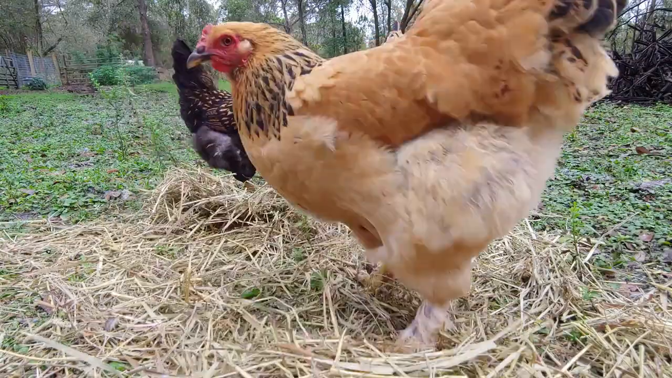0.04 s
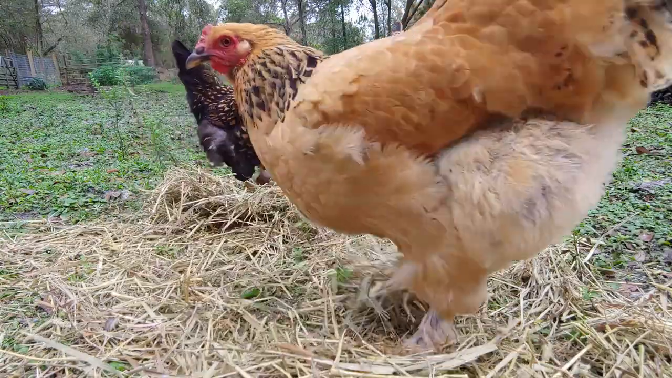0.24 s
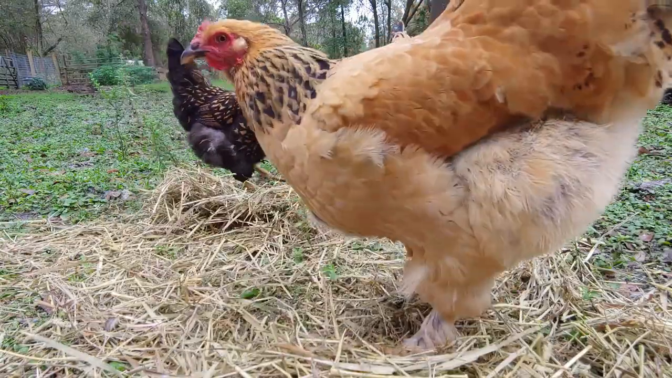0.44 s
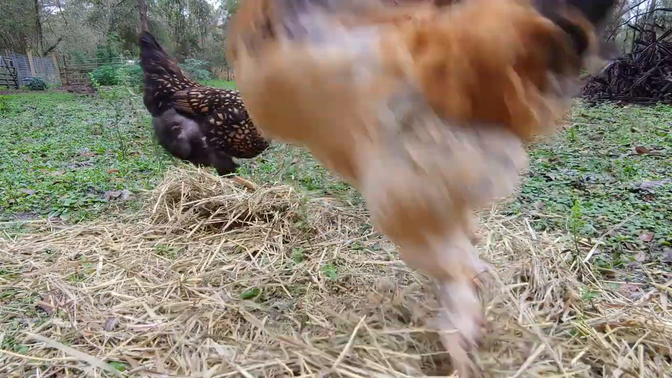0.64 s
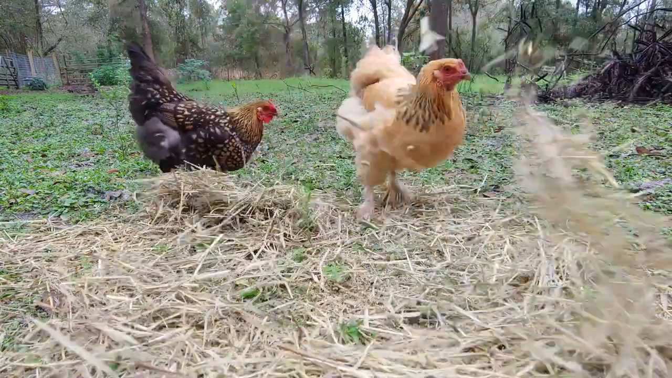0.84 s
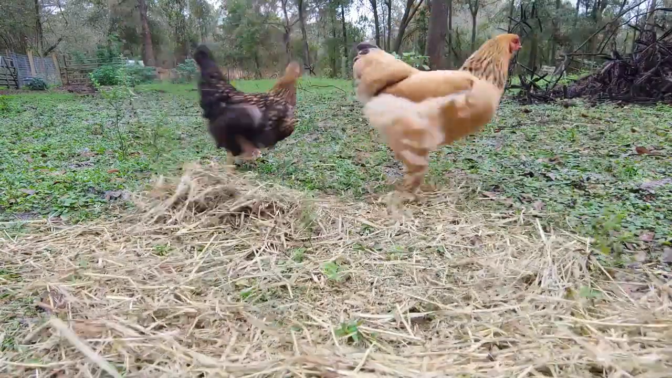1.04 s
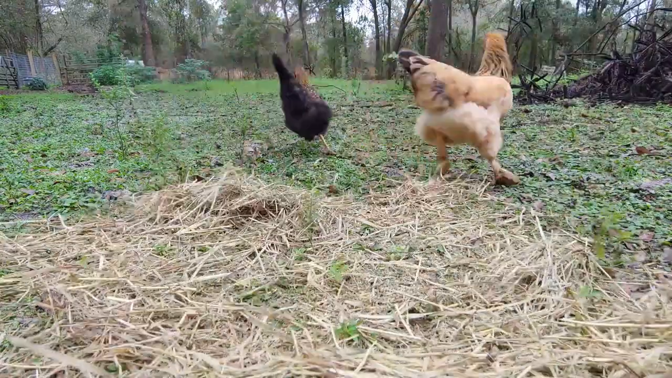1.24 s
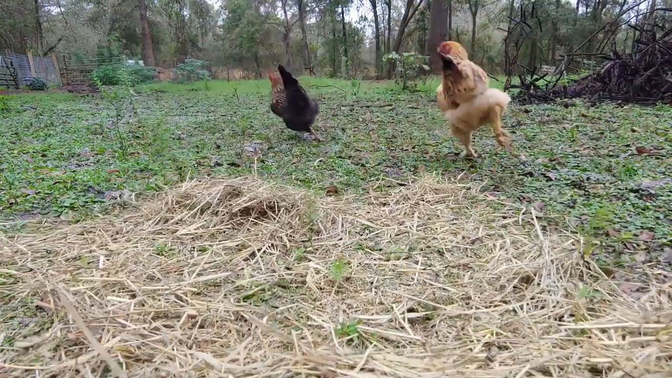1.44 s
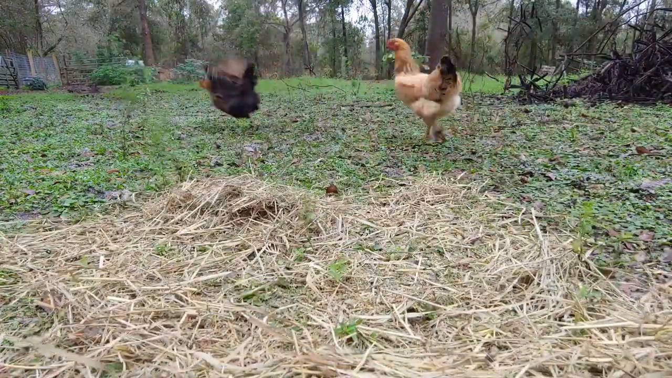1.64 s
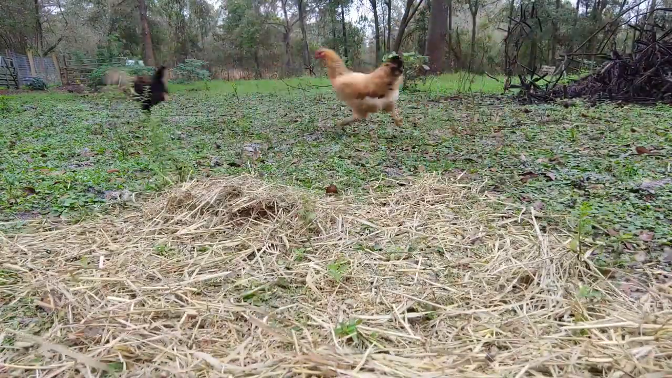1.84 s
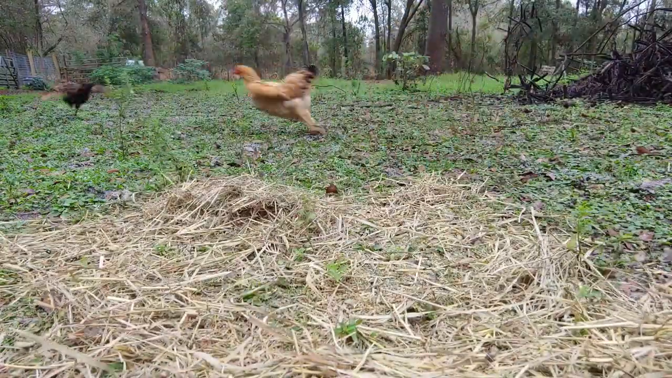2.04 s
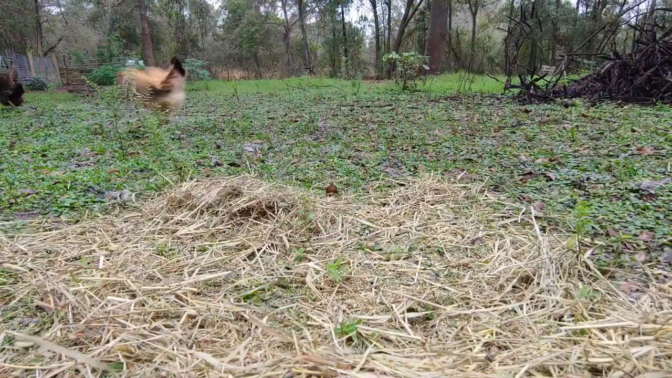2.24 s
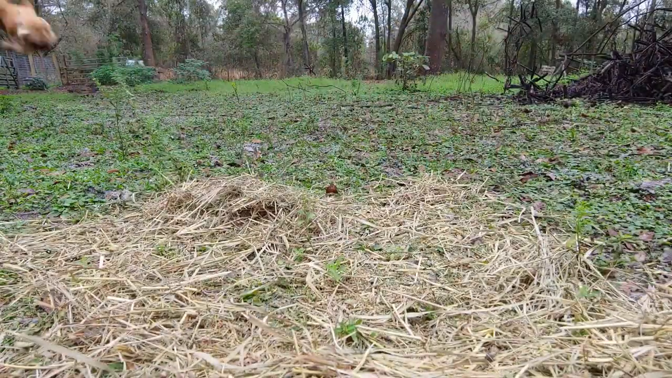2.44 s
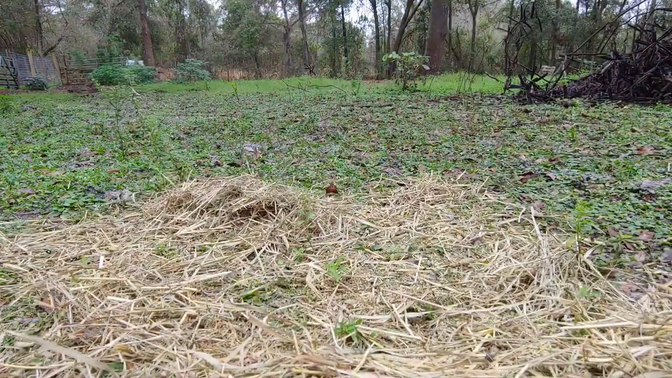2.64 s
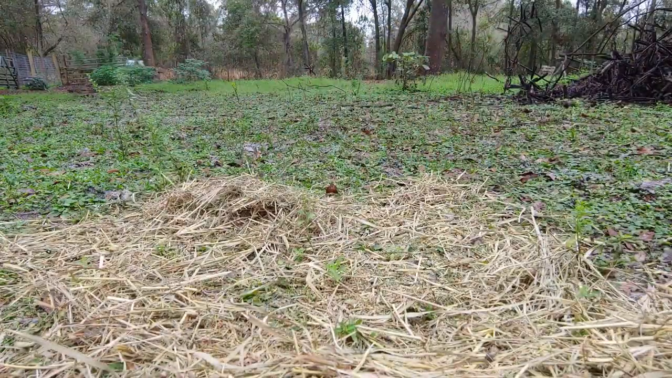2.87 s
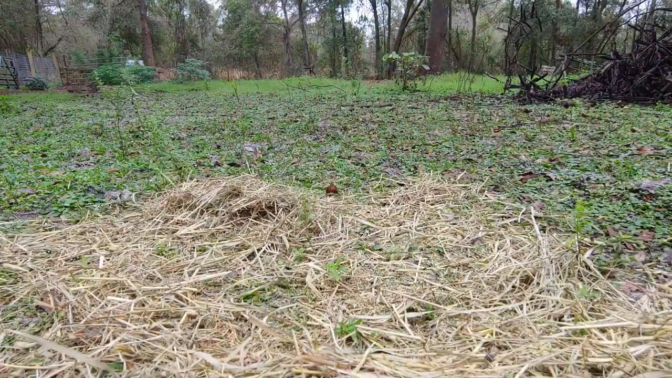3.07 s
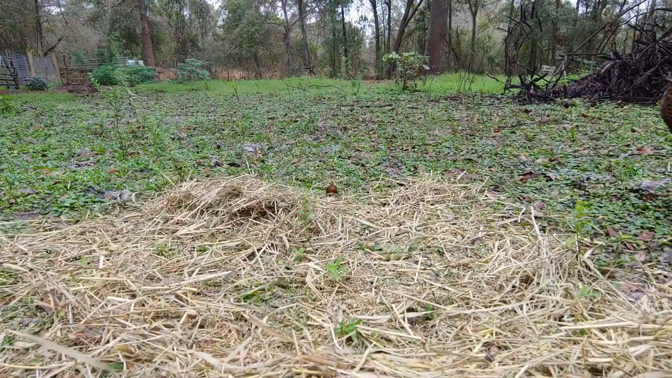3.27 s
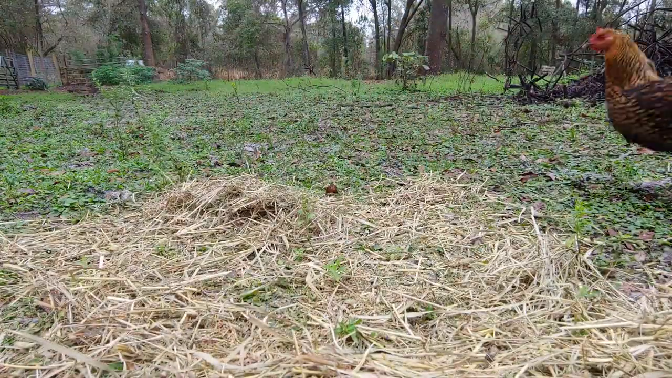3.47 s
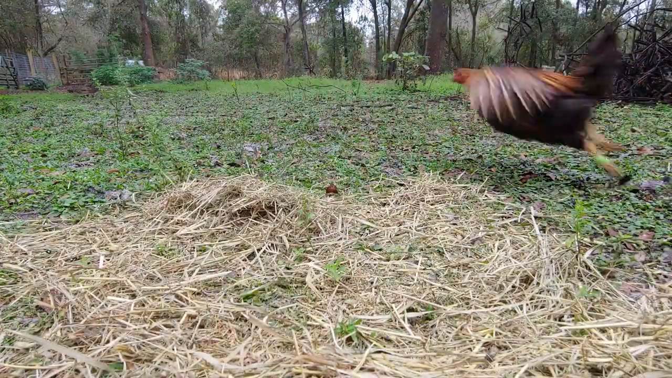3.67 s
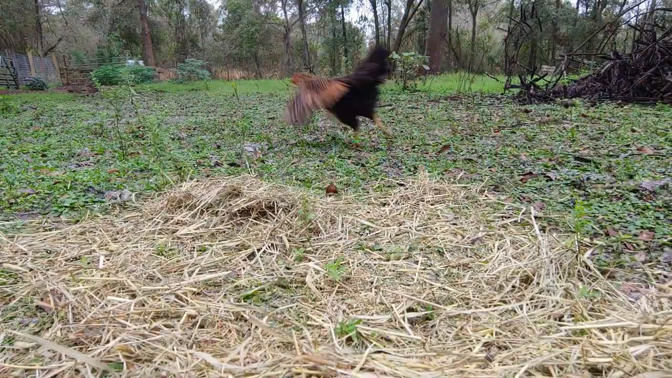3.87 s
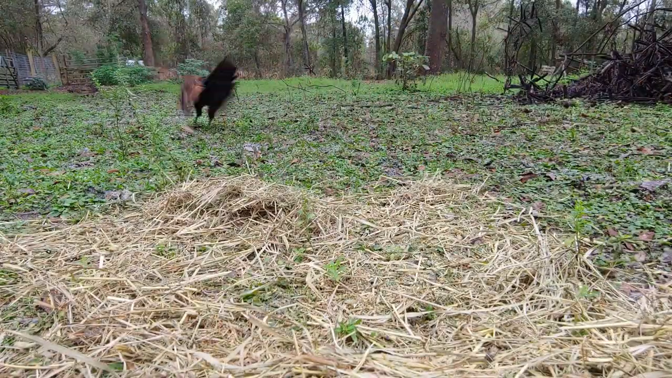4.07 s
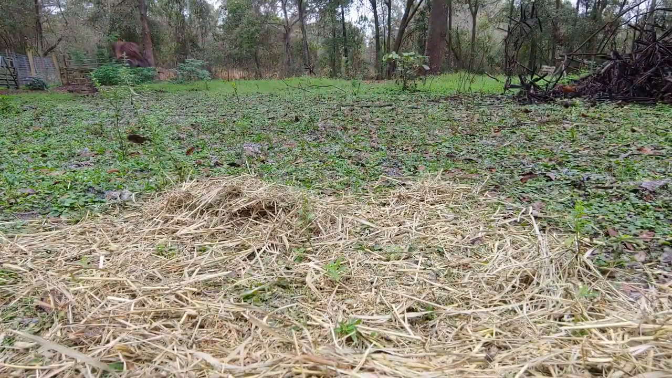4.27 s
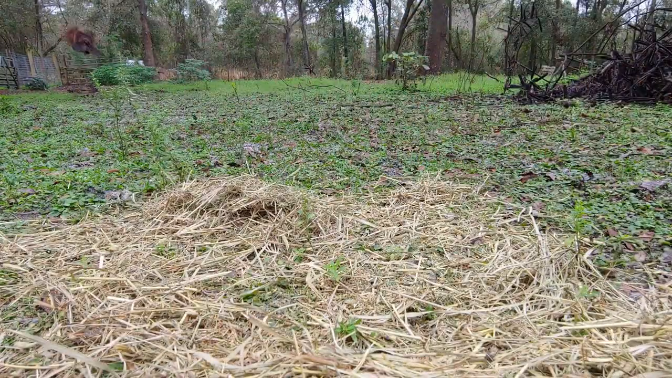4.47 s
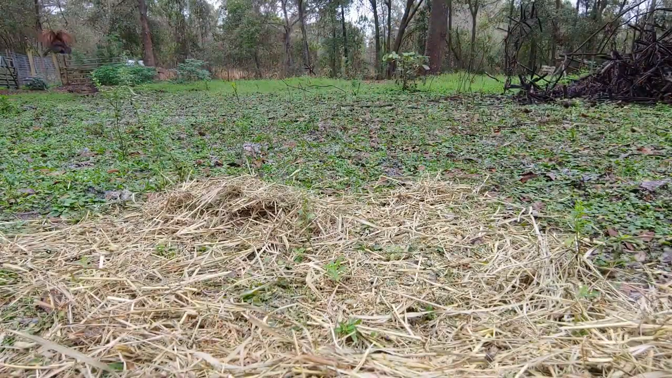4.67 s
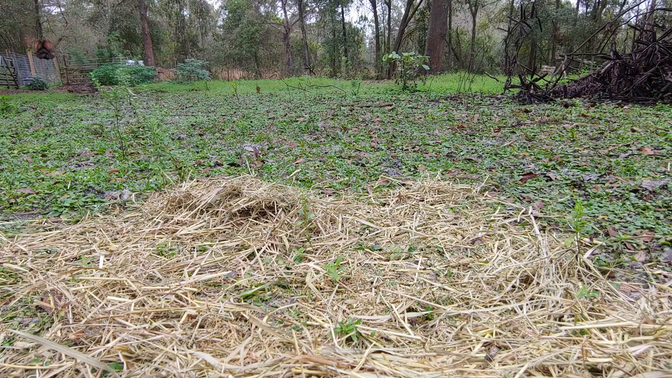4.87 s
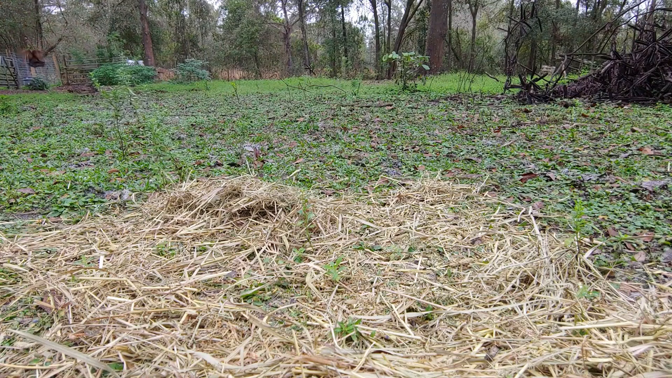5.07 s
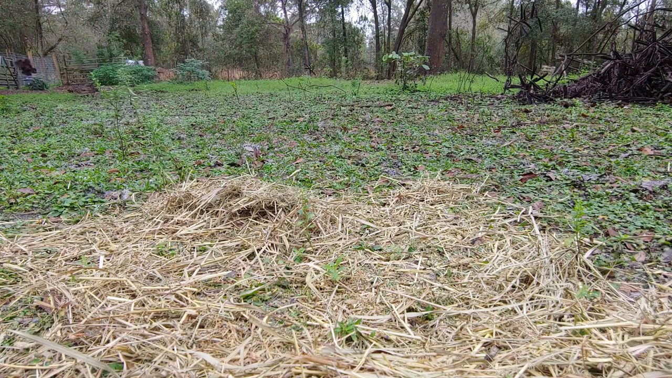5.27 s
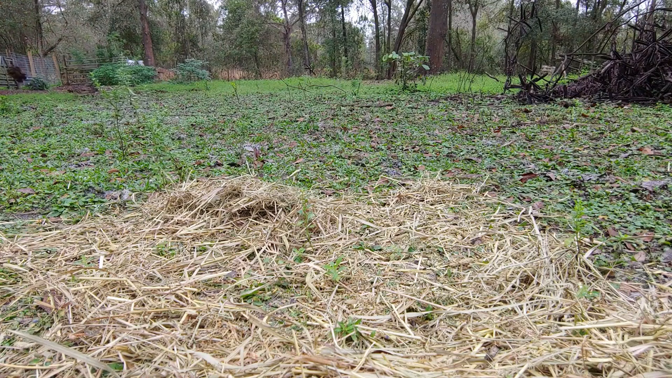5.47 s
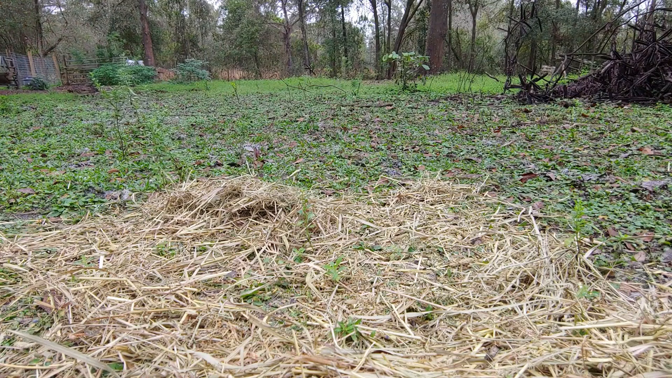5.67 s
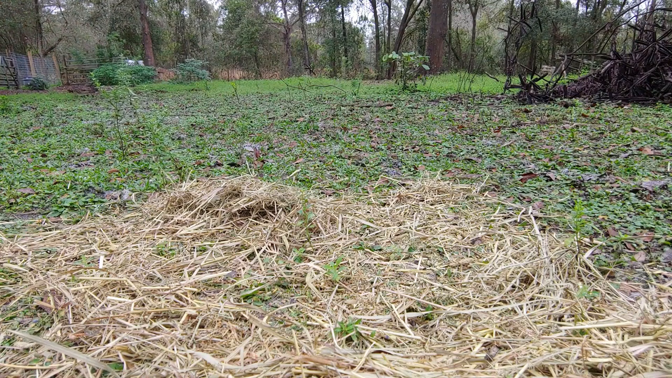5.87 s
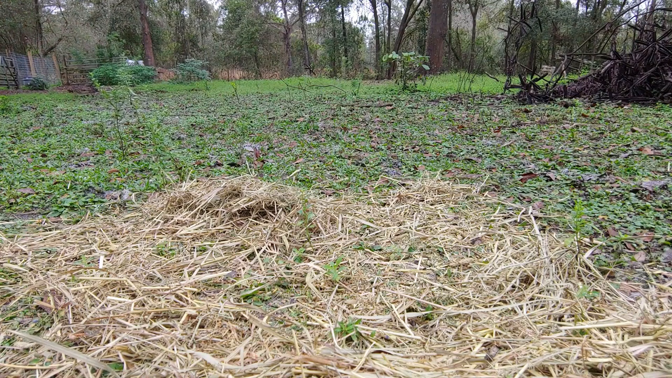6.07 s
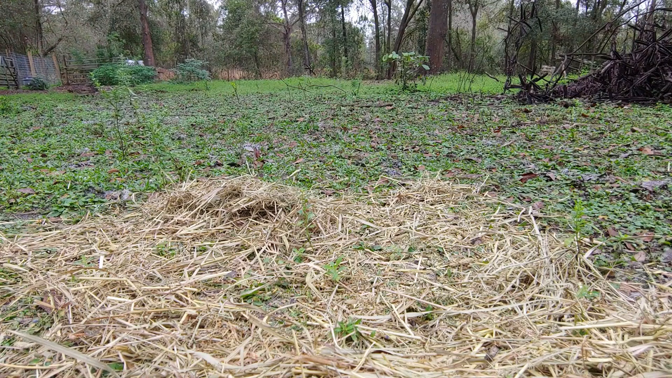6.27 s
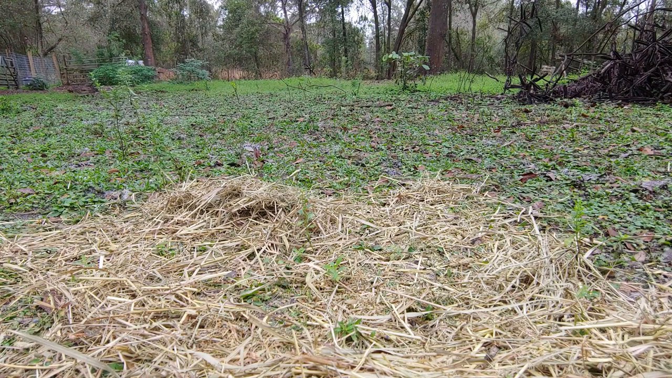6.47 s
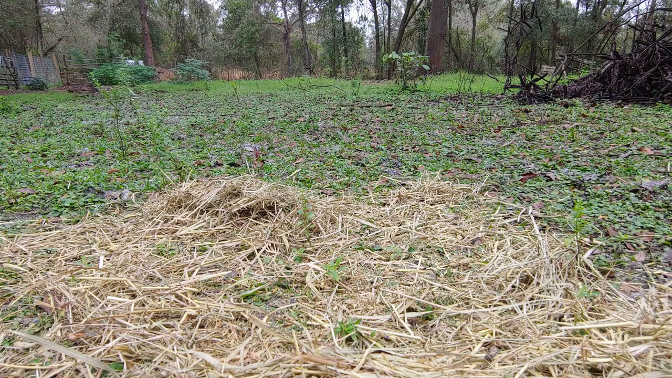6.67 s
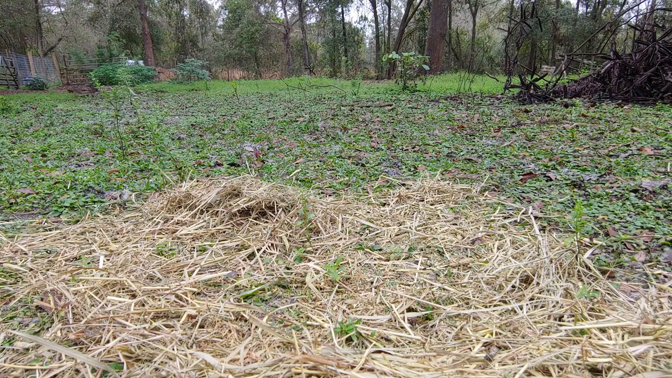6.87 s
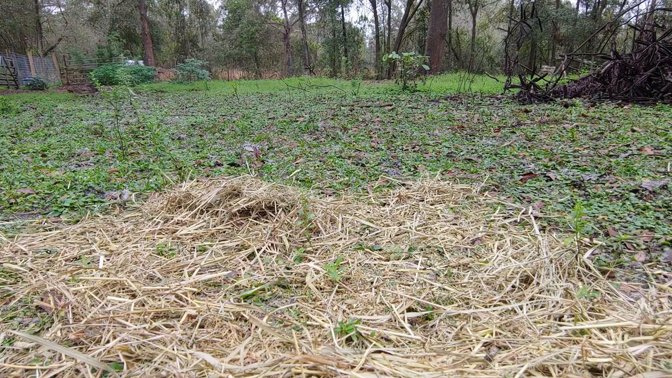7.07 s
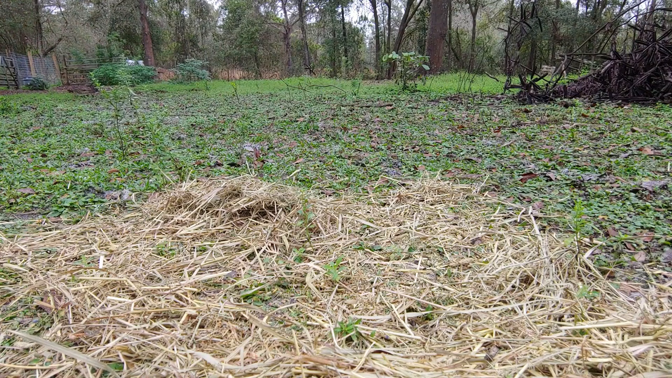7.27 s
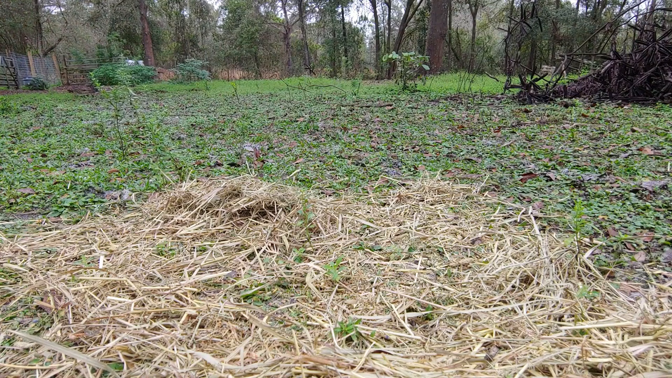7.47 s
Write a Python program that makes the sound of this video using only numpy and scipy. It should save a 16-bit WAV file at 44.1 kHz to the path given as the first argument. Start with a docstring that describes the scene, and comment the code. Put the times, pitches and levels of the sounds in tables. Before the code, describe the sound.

A wooded yard heard by a close stereo microphone near the ground. From 0 to 0.6 s, feet softly rustle dry hay over a faint low motor hum. At about 0.7 s comes a violent burst: a loud crack, feathery flaps, whooshes and a low air buffet strongest on the left, lasting to roughly 0.9 s. Wingbeats then continue about ten a second, with small straw and quill snaps, softening as the hens flee, with a slight low puff near 2.2 s. Flapping thins by 3.4 s. At 3.65 s another hen flutters past, and from 4.0 s short, hoarse, breaking cackles sound, strongest from 4.1 to 4.7 s, echoing among trees and dwindling by 6.2 s. A high bird run falls from 6.1 s. Around 6.5 s everything drops to near silence; from 6.8 s a thin trill and level whistles sing to 7.5 s as the hum faintly returns.

```python
"""In a wooded yard, hens take fright near a pair of microphone ports: wings beat about ten times a second,
each stroke a lumpy turbulent swish, whoosh and air push; quills and straw snap as brief ringing cracks.
Downdraughts buffet mostly the left port. Hens cackle in partials and pulsed rasp, and the trees answer
with a scattered tail. A far motor hums in two low lines over a faint hush.
Near 6.5 s the sound drops to a much quieter stretch where birds whistle in gliding sine tones."""
import sys
import numpy as np
from scipy import signal
from scipy.fft import rfft, irfft, next_fast_len
from scipy.io import wavfile
from scipy.ndimage import uniform_filter1d, map_coordinates

SR = 44100
rng = np.random.default_rng(int(sys.argv[2]) if len(sys.argv) > 2 else 0)


def store_wav(level_fs):
    """Save 16-bit WAV to argv[1]."""
    pcm = np.round(np.clip(np.atleast_2d(level_fs), -1, 1) * 32767)
    wavfile.write(sys.argv[1], SR, pcm.T.astype(np.int16))


N = 331216


def amp(db):
    """Decibel law: amplitude ratio of a level in dB."""
    return 10 ** (np.asarray(db) / 20)


def unit(x):
    """Energy normalisation: scale to an rms of 1."""
    return x / np.sqrt(np.mean(x ** 2) + 1e-20)


def along(points, hz):
    """Logarithmic frequency scale: interpolate (Hz, value) points along it."""
    f, v = np.transpose(points)
    return np.interp(np.log(hz + 1), np.log(f + 1), v)


def curves(rows, t=np.arange(N) / SR):
    """Linear interpolation: one value per moment for each column after the time."""
    s, *cols = np.transpose(rows)
    return [np.interp(t, s, c) for c in cols]


def wobble(rate, size=N):
    """Band-limited fluctuation: a random curve with rate knots a second."""
    knots = rng.standard_normal(int(size * rate / SR) + 4)
    return map_coordinates(knots, [np.arange(size) * rate / SR], order=1)


def filtered(x, response):
    """Linear filtering: multiply the spectrum of x by a response of frequency."""
    m = next_fast_len(x.shape[-1] + 8192)
    spectrum = rfft(x, m) * response(np.fft.rfftfreq(m, 1 / SR))
    return irfft(spectrum, m)[..., :x.shape[-1]]


def rush(spectrum, lumps_db, lump_rate, size=N):
    """Turbulence: coloured noise of rms 1 whose eddies make its strength lumpy."""
    eddies = amp(lumps_db * wobble(lump_rate, size)) * rng.standard_normal(size)
    return unit(filtered(eddies, lambda hz: amp(along(spectrum, hz))))


def humps(events, rise, fall, bed_db=-120):
    """Power addition: amplitude of a bed plus one bell-shaped hump for each (s, dB) event."""
    t = np.arange(N) / SR
    power = np.zeros(N) + amp(bed_db) ** 2
    for s, db in events:
        near = slice(max(round(s * SR) - SR // 6, 0), round(s * SR) + SR // 4)
        width = np.where(t[near] < s, rise, fall)
        power[near] += amp(db) ** 2 * np.exp(-((t[near] - s) / width) ** 2)
    return np.sqrt(power)


def ports(x, early):
    """Time difference of arrival: one source at both ports, the left early by some samples."""
    n = np.arange(N)
    left = map_coordinates(x, [n + early / 2], order=3)
    right = map_coordinates(x, [n - early / 2], order=3)
    return np.array([left, right])


# Strength of the far motor. Each row: time in seconds, rms level in dB.
MOTOR_LEVEL = [(0, -42), (.6, -45), (3.4, -48.5), (5.5, -47.5), (6.2, -48), (6.55, -62), (6.9, -71),
               (7.2, -63), (7.5, -56.5)]
# Lines of its hum. Each row: frequency in Hz, relative mean level in dB.
MOTOR_LINES = [(77.5, 3.5), (154, -9.5)]


def motor():
    """Periodic source: lines share one slightly unsteady speed while each wavers in strength."""
    turn = 2 * np.pi * np.cumsum(1 + 0.0072 * wobble(6)) / SR  # phase of a 1 Hz turn
    note = sum(amp(db + 1.5 * wobble(9.7)) * np.sin(hz * turn) for hz, db in MOTOR_LINES)
    return amp(curves(MOTOR_LEVEL)[0]) * unit(note)


# Colour of the faint background. Each row: frequency in Hz, relative level in dB per Hz.
HUSH_COLOUR = [(59, -33.5), (100, 2), (406, -23), (442, -23), (691, -30), (1870, -29), (2040, -28.5),
               (2370, -37), (6990, -33), (10900, -51), (16000, -35.5)]


def hush():
    """Diffuse field: faint, nearly steady noise, independent at the two ports."""
    return amp(-68) * np.array([rush(HUSH_COLOUR, .5, 11) for _ in "LR"])


# Colour of dry stalks and quills. Each row: frequency in Hz, relative level in dB per Hz.
STALK_COLOUR = [(350, -35.5), (600, -10.5), (1280, -7), (1640, -5), (2800, -8.5), (6920, -4), (8620, -18),
                (11700, -13.5), (16000, -29.5)]


def ticks():
    """Impulsive excitation: stalks and quills tick at random, about 90 times a second."""
    strikes = (rng.random(N) < 90 / SR) * rng.standard_normal(N)
    strikes = strikes * amp(5 * rng.exponential(size=N).clip(0, 2.5))
    return .3 * unit(filtered(strikes, lambda hz: amp(along(STALK_COLOUR, hz))))


# Wing strokes. Each row: time in seconds, relative levels in dB of the feather swish and the whoosh.
STROKES = [(0.637, -39.5, -39.5), (0.716, -34, -21), (0.799, -40.5, -23), (0.981, -48.5, -28),
           (1.093, -54, -34), (1.23, -47, -30), (1.342, -50.5, -32.5), (1.451, -50.5, -31),
           (1.56, -48, -29), (1.657, -54.5, -35), (1.743, -65, -43), (1.865, -53.5, -32.5),
           (1.971, -55, -39), (2.072, -57, -42), (2.224, -49.5, -35), (2.328, -51.5, -27),
           (2.42, -52.5, -37), (2.52, -51.5, -29.5), (2.618, -56, -32), (2.728, -53.5, -35),
           (2.832, -55.5, -42), (2.94, -55.5, -40), (3.044, -61.5, -38.5), (3.15, -59, -40),
           (3.284, -65.5, -43.5), (3.387, -57.5, -46), (3.491, -68, -53), (3.665, -45, -31),
           (3.769, -45.5, -33.5), (3.866, -46.5, -30.5), (3.97, -49.5, -33), (4.053, -51.5, -28.5),
           (4.151, -43, -31), (4.244, -52.5, -27), (4.343, -45, -31), (4.462, -50, -39.5), (4.55, -52, -46),
           (4.636, -49.5, -45), (4.741, -60, -47), (4.835, -57.5, -47), (4.94, -50, -50),
           (5.052, -63.5, -48.5), (5.167, -51, -45), (5.29, -48, -50), (5.359, -58, -56), (5.508, -62, -56),
           (5.588, -64, -49)]
# What sounds between strokes. Each row: time in seconds, relative levels in dB of the rustle of hay, leaves
# and feathers, of the whoosh and of the rumble.
BETWEEN_STROKES = [(0, -68, -60, -55), (0.7, -63, -57, -48), (0.87, -44, -32.5, -34), (1.05, -48, -33, -36),
                   (1.4, -52.5, -41, -39), (1.9, -57.5, -38, -46), (2.13, -60.5, -47.5, -34),
                   (2.39, -52.5, -33, -38), (2.79, -55, -43, -42), (3.46, -63, -51, -56),
                   (3.86, -57.5, -39, -53), (4.25, -45, -41.5, -42), (4.6, -54, -48, -42),
                   (5.19, -58, -54, -48), (5.85, -58, -53.5, -48), (6.2, -68, -60, -52),
                   (6.5, -69.5, -58, -58), (6.56, -86, -73, -64), (6.7, -87, -75, -66),
                   (7.51, -84, -71, -61)]
# Where the flock is. Each row: time in seconds, samples by which the left port hears it first,
# left-right difference in dB.
FLOCK_PLACE = [(0, -1, -3.2), (.7, 14, 3), (1.2, 17.5, 1.3), (1.7, 21, 1.7), (2.2, 9.5, 0), (2.7, 16, 0.9),
               (3.3, 18.5, 0.5), (3.6, -10, 0.5), (3.9, 0, -1.3), (4.2, 11.5, 1), (5, 13.5, 1),
               (7.5, 11.5, 0.5)]
# Top treble of the wings with distance. Each row: time in seconds, gain in dB above 9500 Hz.
TREBLE_GAIN = [(0, 2), (1.7, 1.5), (2.5, 1.5), (3.9, .5), (4.3, -4), (5.5, -3), (6.4, -6.5), (7.5, 4)]
# Colours of feathers, whoosh and air push. Each row: frequency in Hz, relative level in dB per Hz.
FEATHER_COLOUR = [(410, -30), (700, -5.5), (777, -8.5), (1180, -9), (2000, -4), (3200, -9.5), (4670, -8),
                  (5330, -13), (7010, -7), (8530, -26.5), (11800, -21), (13000, -36.5), (16000, -38.5)]
WHOOSH_COLOUR = [(53, -17.5), (90, -2), (226, -6), (341, -7), (467, -13.5), (654, -20), (1200, -42.5),
                 (1560, -64), (2640, -120)]
PUSH_COLOUR = [(11, -37), (18, -2.5), (75, -4), (110, -12.5), (140, -30), (240, -120)]
# relative push of a stroke that whooshes at -35 dB, dB of push per dB of whoosh, random spread in dB
PUSH_DB, PUSH_GROWS, PUSH_SCATTER_DB = -37, .6, 2


def wings():
    """Aerodynamic noise: each stroke swishes through the feathers, whooshes and pushes air."""
    rustle_db, whoosh_db, rumble_db = curves(BETWEEN_STROKES)
    s, swish_db, rush_db = np.transpose(STROKES)
    push_db = PUSH_DB + PUSH_GROWS * (rush_db + 35) + PUSH_SCATTER_DB * rng.standard_normal(len(s))
    swish = amp(-1.0) * humps(zip(s, swish_db), 0.016, 0.022, rustle_db)
    whoosh = humps(zip(s, rush_db), .012, 0.016, whoosh_db)
    push = amp(-3.0) * humps(zip(s, push_db), 0.0305, 0.043, rumble_db)

    feathers = swish * (rush(FEATHER_COLOUR, 4, 150) + ticks())
    direct = feathers + whoosh * rush(WHOOSH_COLOUR, 3.5, 130) + flaps()
    scattered = []  # independent at each port
    for _ in "LR":
        port = 1.71 * swish * rush(FEATHER_COLOUR, 5.5, 150)
        port += 0.26 * whoosh * rush(WHOOSH_COLOUR, 1.8, 130)
        port += 0.31 * push * rush(PUSH_COLOUR, 1.5, 12)
        scattered.append(port)

    early, pan_db = curves(FLOCK_PLACE)
    flock = ports(direct, early) + push * rush(PUSH_COLOUR, 1.5, 15) + scattered
    treble_db, = curves(TREBLE_GAIN)
    flock -= (1 - amp(treble_db)) * filtered(flock, lambda hz: hz > 9500)  # air and leaves dull what is far
    return flock * amp(np.array([pan_db, -pan_db]) / 2)


# Feet shifting in the hay. Each row: time in seconds, level in dB.
FOOTSTEPS = [(0.02, -47), (0.29, -49), (0.43, -60), (0.6, -55)]
STEP_RISE_S, STEP_FALL_S = .045, .048


def hay():
    """Frictional noise: feet shift in the dry stalks before the fright."""
    stalks = np.array([rush(STALK_COLOUR, 3, 200) for _ in "LR"])
    return humps(FOOTSTEPS, STEP_RISE_S, STEP_FALL_S) * stalks


# Quill and straw snaps. Each row: time in seconds, relative level in dB, ring in Hz, left-right difference in dB.
SNAP_EVENTS = [(0.6264, -32, 7130, -8.5), (0.6935, -6, 1700, 0.5), (0.785, -20, 3360, -3),
               (0.8225, -19, 2000, 3), (0.8683, -15.5, 2490, 3), (0.9073, -16.5, 1490, 8.5),
               (0.9766, -20, 5360, 2), (1.0873, -27.5, 7050, -3), (1.1257, -25, 2240, 12),
               (1.1957, -26, 2360, 7), (1.231, -23, 2370, 3), (1.306, -24.5, 4770, 12),
               (1.3415, -27, 2760, -6), (1.4138, -25.5, 1850, 10.5), (1.542, -31, 2150, -1),
               (1.557, -13.5, 7500, 13), (1.649, -25.5, 4100, 0), (1.8645, -26, 4400, -1.5),
               (2.1718, -27, 7300, -2), (2.2192, -25, 2380, -13), (2.487, -28.5, 2620, -1.0),
               (2.5036, -29, 4200, 10), (2.5191, -20.5, 6800, -3.5), (2.6143, -26, 2750, -7),
               (3.044, -31, 2240, 1.5), (3.6575, -23.5, 4000, -11), (3.7636, -19, 1820, -6),
               (3.8553, -27, 1860, -3.0), (3.9528, -29.5, 1970, -9.5), (4.0605, -31.5, 6600, 3),
               (4.0875, -22.5, 3540, 4.5)]


def snaps():
    """Impulse response: a short noisy crack comes with a brief damped ring."""
    out, t = np.zeros((2, N)), np.arange(SR // 25) / SR
    early = curves(FLOCK_PLACE)[0]
    attack = 1 - np.exp(-t / 0.0019)
    for s, db, hz, pan_db in SNAP_EVENTS:
        noise = filtered(rng.standard_normal(len(t)), lambda f: amp(along(FEATHER_COLOUR, f)))
        crack = unit(noise) * amp(-60 * t / 0.0088)  # falls 60 dB in 8.8 ms
        ring = .3 * np.sin(2 * np.pi * hz * t) * amp(-60 * t / .007)
        for port, side in zip(out, (.5, -.5)):
            start = round(s * SR - side * early[round(s * SR)])
            port[start:start + len(t)] += amp(db + 3.0 + side * pan_db) * (crack + ring) * attack
    return out


# Gusts on the ports. Each row: start, rise, hold and fall in seconds, relative level in dB.
GUSTS = [(0.68, .08, .11, .05, -15), (2.12, .04, .01, .02, -32.5), (2.21, .04, .005, .03, -28)]
# Colour of the buffeting. Each row: frequency in Hz, relative level in dB per Hz.
BUFFET_COLOUR = [(8.8, -37), (15, 4.5), (124, -1), (204, -12.5), (304, -12), (421, -29.5), (600, -21.5),
                 (780, -49), (1320, -120)]
GUST_EDGE_DB = -28  # both ends of a gust relative to its hold


def downdraught():
    """Turbulent pressure: eddies from the nearest hens' wings strike the left port far harder than the right."""
    eddies = np.array([rush(BUFFET_COLOUR, 3.5, 40) for _ in "LR"])
    eddies /= np.sqrt(np.abs(uniform_filter1d(eddies ** 2, size=3000)) + 1e-9)  # even out slow swells
    gain, t = np.zeros(N), np.arange(N) / SR
    for s, rise, hold, fall, db in GUSTS:
        knots = s + np.cumsum([0, rise, hold, fall])
        shape_db = np.interp(t, knots, [GUST_EDGE_DB, 0, 0, GUST_EDGE_DB], left=-99, right=-99)
        gain += amp(db + shape_db)
    return gain * amp([[5.5], [-9]]) * eddies


# Mid-pitched flaps, strongest near 0.8 s. Each row: time in seconds, relative level in dB.
FLAP_EVENTS = [(0.695, -28), (0.725, -25), (0.762, -25), (0.8, -21), (0.83, -27), (0.91, -27), (0.955, -33),
               (1.01, -27), (1.06, -32), (1.12, -32), (1.24, -36.5), (1.32, -43), (1.45, -41), (1.36, -44),
               (1.56, -43), (1.65, -45), (1.73, -46), (1.81, -42), (2, -50), (2.23, -52), (2.33, -50),
               (2.58, -44), (3.66, -48), (3.76, -50), (3.86, -46), (3.955, -39)]
# Colour of a flap, mostly 500 to 1700 Hz. Each row: frequency in Hz, relative level in dB per Hz.
FLAP_COLOUR = [(290, -38), (500, -13.5), (749, -4.5), (1000, -9), (1190, -10), (1700, -11), (2400, -31),
               (4500, -60), (9000, -120)]
FLAP_RISE_S, FLAP_FALL_S = .009, .016


def flaps():
    """Amplitude-modulated noise: short mid-pitched noise bursts of the wingbeats."""
    return humps(FLAP_EVENTS, FLAP_RISE_S, FLAP_FALL_S) * rush(FLAP_COLOUR, 2.78, 110)


BREAK_S, SAG = .003, .965  # time the voice takes to turn clear or hoarse; pitch at the end of the core over its top
# an onset begins this far under its level and swells over this share of it; a tail dies this far
START_DB, SWELL, END_DB = -14, .35, -9


def phrase(s, onset, core, tail):
    """Pitch and level contour: rows (s, pitch Hz, relative level dB, roughness) of one cackle."""
    top, turn, sagged = s + onset[0], s + onset[0] + core[0], SAG * core[1]

    def gliding(share):
        return (s + share * onset[0], onset[1] + share * (core[1] - onset[1]), *onset[2:])

    return [(s, onset[1], onset[2] + START_DB, onset[3]),
            gliding(SWELL),
            gliding(max(1 - BREAK_S / onset[0], SWELL)),
            (top, *core[1:]),
            ((top + turn) / 2, *core[1:]),
            (turn, sagged, *core[2:]),
            (turn + BREAK_S, sagged + BREAK_S / tail[0] * (tail[1] - sagged), *tail[2:]),
            (turn + tail[0], tail[1], tail[2] + END_DB, tail[3])]


# Cackles. Each row: start in seconds, opening of the beak as tilt in dB an octave, then onset, core and tail,
# each with length in seconds, pitch in Hz, relative level in dB, roughness from 0 to 1.
# The onset glides from its pitch to the core's, the tail from the core's sagged pitch to its own.
CACKLES = [(4.008, -26.5, (.01, 660, -36, .6), (.022, 770, -31, .25), (.01, 720, -40, .4)),
           (4.083, 1, (.025, 950, -19, .1), (.022, 1200, -17.5, .05), (.019, 900, -23, .25)),
           (4.148, -.5, (.022, 658, -27, .8), (.02, 735, -26.5, .55), (.052, 630, -23, .8)),
           (4.242, -1, (.018, 898, -28.5, .85), (.016, 1260, -24.5, .22), (.024, 606, -25, .82)),
           (4.308, 2, (.006, 1345, -28, .3), (.008, 1370, -28, .4), (.008, 1300, -26, .7)),
           (4.324, 1, (.012, 1080, -24, .5), (.018, 1325, -20, .08), (.026, 608, -30, .8)),
           (4.434, 1, (.015, 900, -31.5, .8), (.021, 1320, -21, .04), (.03, 620, -28, .9)),
           (4.604, 5, (.028, 740, -23, .9), (.017, 1290, -24.5, .25), (.026, 760, -31, .75)),
           (4.739, 2, (.016, 990, -34, .85), (.016, 1230, -29, .55), (.022, 1110, -30, .85)),
           (4.906, 3.5, (.017, 985, -34, .17), (.008, 1450, -27, .9), (.004, 1300, -25, .7)),
           (4.93, 3.5, (.004, 1300, -25, .4), (.016, 1280, -27, .3), (.034, 1000, -32, .85)),
           (5.085, 2, (.028, 520, -36, .22), (.012, 645, -31, .6), (.004, 640, -31, .8)),
           (5.118, 4.9, (.008, 1280, -29, .8), (.02, 1230, -30, .7), (.03, 1200, -36, .85)),
           (5.242, .5, (.023, 732, -38, .25), (.018, 1240, -32, .35), (.036, 1200, -35, .7)),
           (5.42, -3, (.037, 513, -42, .2), (.02, 900, -43, .6), (.035, 1200, -42, .85)),
           (5.632, 6, (.048, 522, -43, .35), (.024, 1265, -37, .4), (.02, 1180, -44, .6)),
           (5.797, -5, (.022, 500, -45, .16), (.012, 800, -44, .12), (.014, 1150, -47, .6)),
           (5.842, 2, (.01, 590, -42, .3), (.024, 605, -38, .25), (.02, 600, -41, .5)),
           (5.935, 9, (.01, 598, -52, .4), (.03, 610, -51, .3), (.014, 580, -50, .3)),
           (5.982, -6, (.022, 405, -46, .17), (.024, 760, -57, .3), (.03, 620, -47, .15)),
           (6.01, -16, (.01, 390, -50, .05), (.01, 410, -47, .1), (.01, 380, -51, .1)),
           (6.18, -22, (.028, 428, -54, .05), (.016, 650, -46.5, .07), (.014, 560, -51, .08))]
# The throat's colour for clear partials and for rasp. Each row: frequency in Hz, relative level in dB.
THROAT_COLOUR = [(300, -7.5), (750, -2.5), (1200, 2.5), (1800, -6.5), (2450, -6.5), (3000, -11.5),
                 (3550, -4), (3900, -25), (4800, -23), (6000, -25), (9000, -53), (13000, -100)]
RASP_COLOUR = [(300, -39.5), (680, -8), (950, -22), (1250, -3.5), (1600, 6), (2050, -10.5), (2550, -3.5),
               (3050, -8), (3600, -6.5), (4400, -13.5), (5300, -28), (7200, -33), (9000, -46), (12500, -80),
               (16000, -110)]


def cackle():
    """Source and filter: throat-coloured partials; a rough voice wavers, breaks to half pitch and rasps."""
    out = np.zeros(N)
    for s, tilt_db, *parts in CACKLES:
        note = phrase(s, *parts)
        start, stop = round(note[0][0] * SR), round(note[-1][0] * SR)
        t = np.arange(start, stop) / SR
        hz, db, rough = curves(note, t)
        hz, rough = uniform_filter1d(hz, size=200, mode="nearest"), np.clip(rough, 0, 1)
        turn = 2 * np.pi * np.cumsum(hz * (1 + .1 * rough * wobble(300, len(t)))) / SR

        k = np.arange(1, 25)[:, None] / 2
        halfway = np.where(k % 1, 0.44 * rough, 1)  # alternate cycles differ: lines between the partials
        slope_db = tilt_db - .9 * (db.max() - db)  # a softer moment is also duller
        partial_db = along(THROAT_COLOUR, k * hz) + slope_db * np.log2(np.maximum(k, 1))
        clear = np.sum(halfway * amp(partial_db) * np.sin(k * turn), axis=0)
        clear = clear / np.sqrt(np.abs(uniform_filter1d(clear ** 2, size=220)) + 1e-9)
        clear = clear * amp(1.9 * rough * wobble(200, len(t)))

        colour = [(f, level + tilt_db * np.log2(f / 1200)) for f, level in RASP_COLOUR]
        puffs = (1.2 + np.cos(turn / 2)) ** 1.5  # a puff on every second cycle
        rasp = unit(rush(colour, 3.5, 250, len(t)) * puffs)
        edge = np.clip(np.minimum(t - t[0], t[-1] - t) / 0.0049, 0, 1)
        share = 0.97 * rough ** 2  # rasp's part of the power
        voice = np.sqrt(1 - share) * clear + np.sqrt(share) * rasp
        out[start:][:len(t)] += amp(db) * edge * voice
    return out


# Decay of the scattered sound. Each row: frequency in Hz, time in seconds to fall 60 dB.
TREE_DECAY = [(300, .4), (1300, 1.0), (3700, .9), (5000, .45), (9000, .3)]


def trees(x):
    """Reverberation: trunks and fences scatter the sound back; each frequency dies at its own speed."""
    hz, t, z = signal.stft(rng.standard_normal((2, SR)), SR, nperseg=256)
    decay = amp(-60 * t / along(TREE_DECAY, hz)[:, None])
    tail = signal.istft(z * decay, SR, nperseg=256)[1]
    x = map_coordinates(x, [np.arange(N) + 9 * wobble(45)], order=1)  # stirring leaves blur the pitch of the answer
    late = np.pad(x, (700, 0))[None]  # samples of delay
    return signal.fftconvolve(late, tail / np.linalg.norm(tail[0]), axes=1)[:, :N]


# A songbird's falling run, then a trill. Each row: start in seconds, pitch in Hz it slides up to, relative level in dB.
SONG_NOTES = [(6.11, 6800, -58), (6.193, 6350, -64), (6.268, 6070, -65), (6.347, 6000, -65),
              (6.432, 4600, -70), (6.54, 4200, -77), (6.816, 7050, -61), (6.909, 7030, -56),
              (7.001, 6930, -56), (7.098, 7050, -58), (7.19, 7000, -56), (7.298, 7110, -58.5),
              (7.389, 7180, -63), (7.44, 7270, -65)]
# Another bird's nearly level whistles. Each row: start in seconds, pitch in Hz, relative level in dB.
PIPING_NOTES = [(7.003, 5100, -67), (7.1, 5250, -66), (7.195, 5250, -68), (7.285, 5320, -63),
                (7.398, 5400, -78), (7.33, 3510, -79), (7.385, 3520, -78)]
# note length, slide of the song in octaves, final droop as a share of the slide, random waver as a share of pitch
NOTE_S, SLIDE_OCTAVES, DROOP, WAVER = .07, .55, .02, .004


def songbird():
    """Frequency modulation: thin wavering whistles slide up, then droop in proportion to their slide."""
    out, t = np.zeros(N + SR), np.arange(round(NOTE_S * SR)) / SR
    swell = np.sin(np.pi * (t / NOTE_S) ** .8)
    for notes, slide in (SONG_NOTES, SLIDE_OCTAVES), (PIPING_NOTES, .04):
        octaves = -slide * np.exp(-t / .0028) - DROOP * slide * (t / NOTE_S) ** 6
        for s, hz, db in notes:
            pitch = hz * 2 ** octaves * (1 + WAVER * wobble(150, len(t)))
            whistle = np.sin(2 * np.pi * np.cumsum(pitch) / SR)
            out[round(s * SR):][:len(t)] += amp(db) * swell * whistle
    return out[:N]


# The hens' voices by way of the trees. Each row: time in seconds, relative level in dB.
ECHO_LEVEL = [(4, -8.5), (4.5, -11.5), (5.2, -12), (5.8, -3), (6.2, -12.5)]


def scene():
    """Superposition: direct voices, their scattered answer and all other sources add at the ports."""
    hens, birds = cackle(), songbird()
    echo = trees(amp(curves(ECHO_LEVEL)[0]) * hens + amp(-3) * birds)
    direct = ports(amp(4.0) * hens + birds, curves(FLOCK_PLACE)[0])
    voices = direct * amp([[.9], [-.9]]) + echo
    return voices + wings() + snaps() + hay() + downdraught() + motor() + hush()


TOP_HZ = 15830


def record(dry):
    """Band limitation: nothing is kept above the top frequency."""
    return filtered(dry, lambda hz: hz < TOP_HZ)


dry = scene()
out = record(dry)
store_wav(out)
```